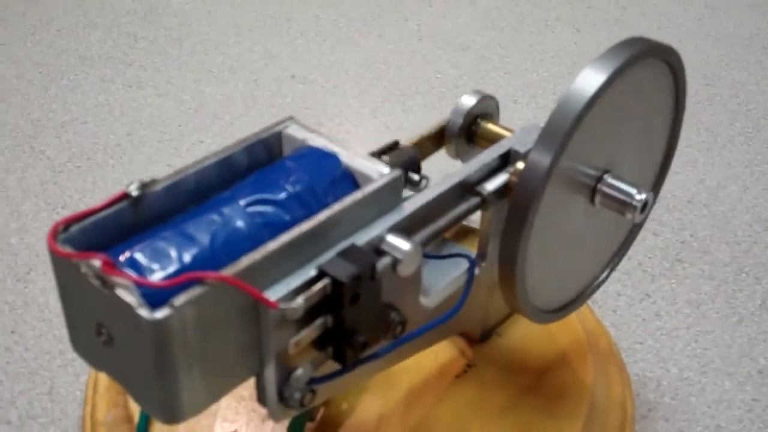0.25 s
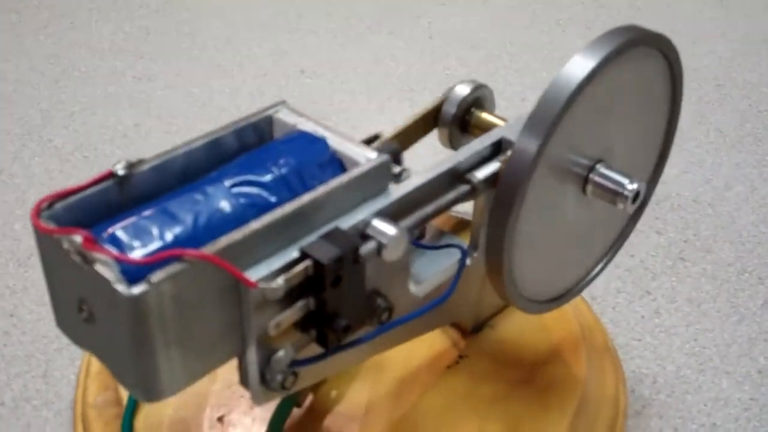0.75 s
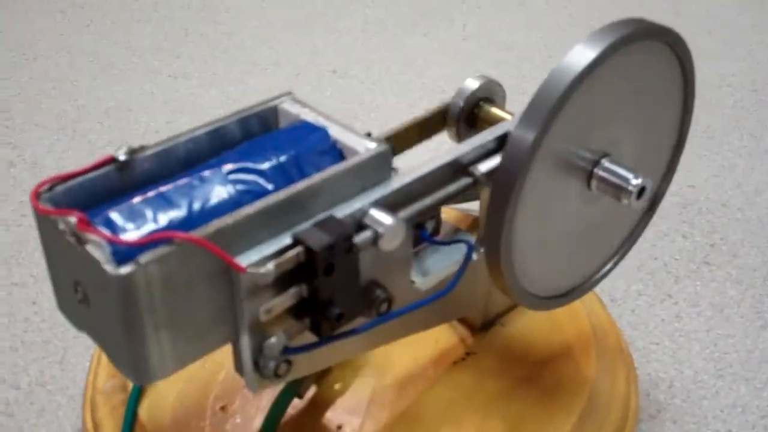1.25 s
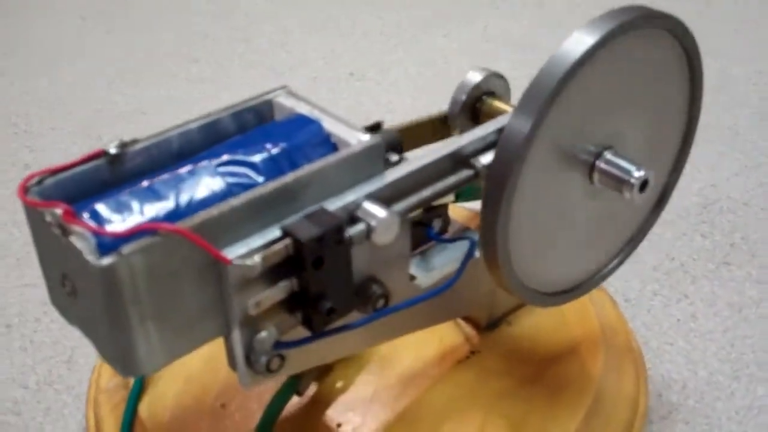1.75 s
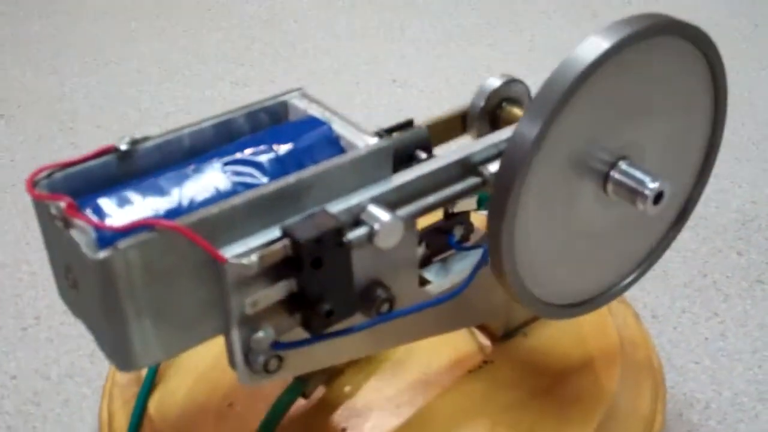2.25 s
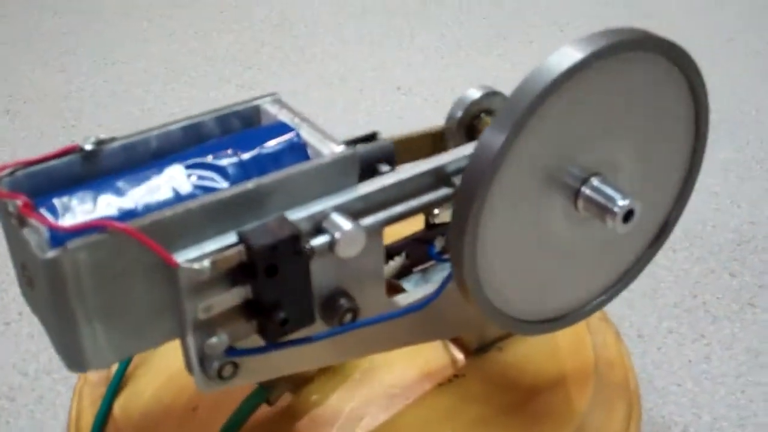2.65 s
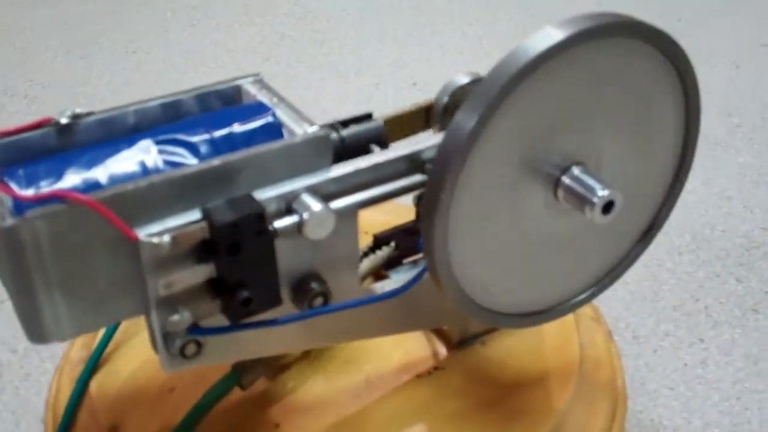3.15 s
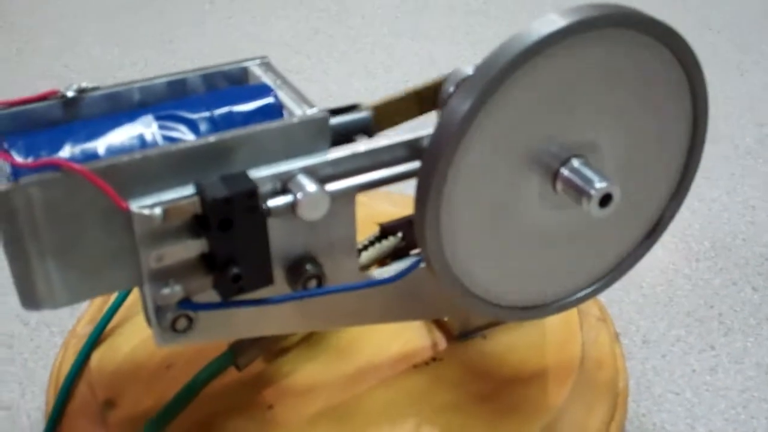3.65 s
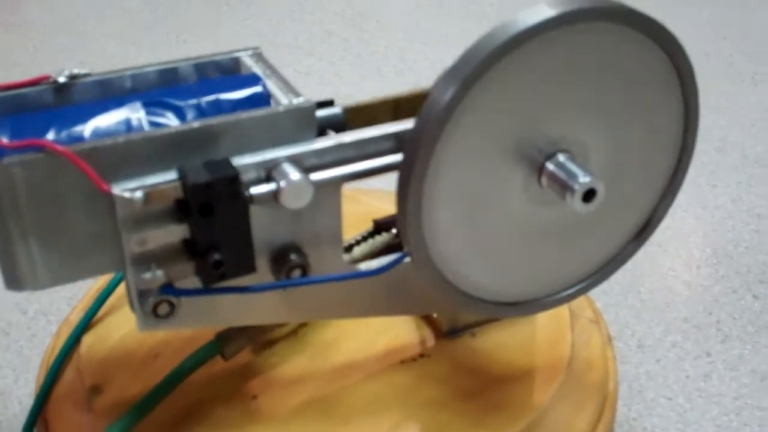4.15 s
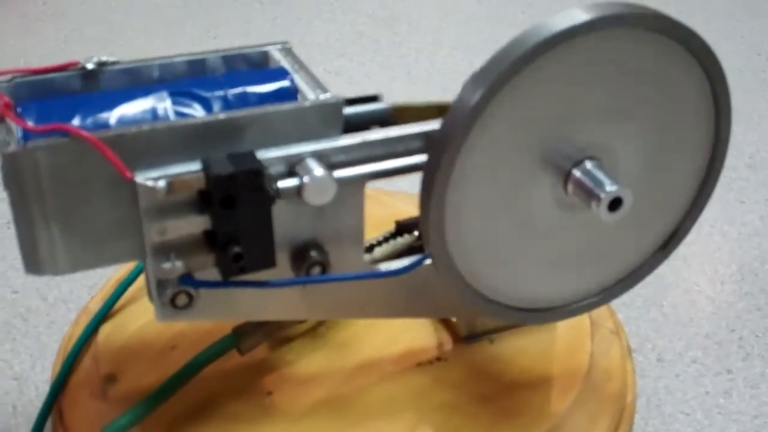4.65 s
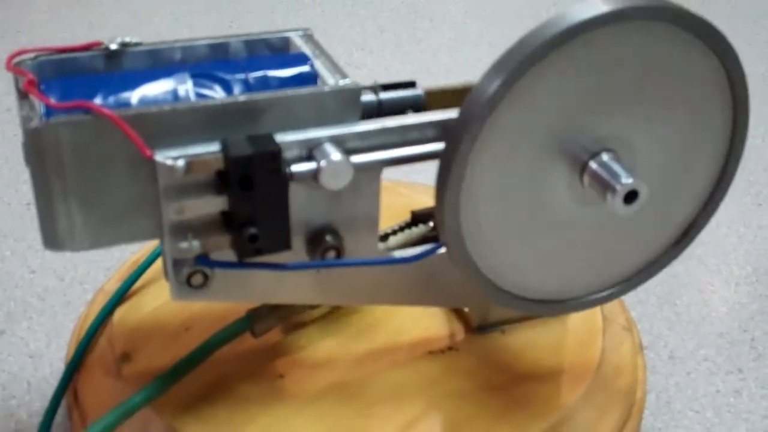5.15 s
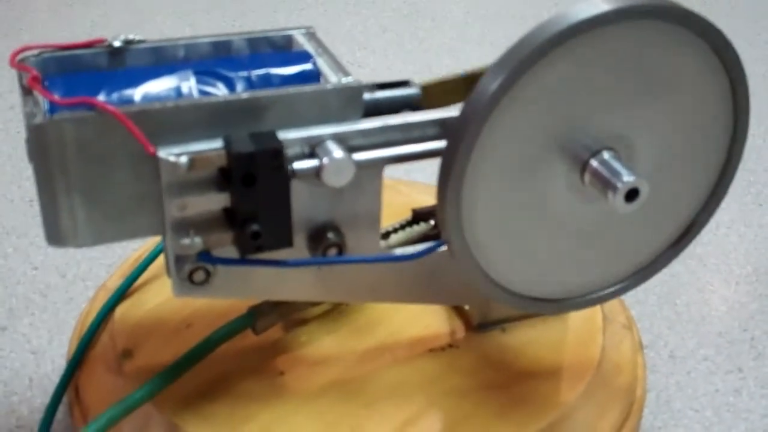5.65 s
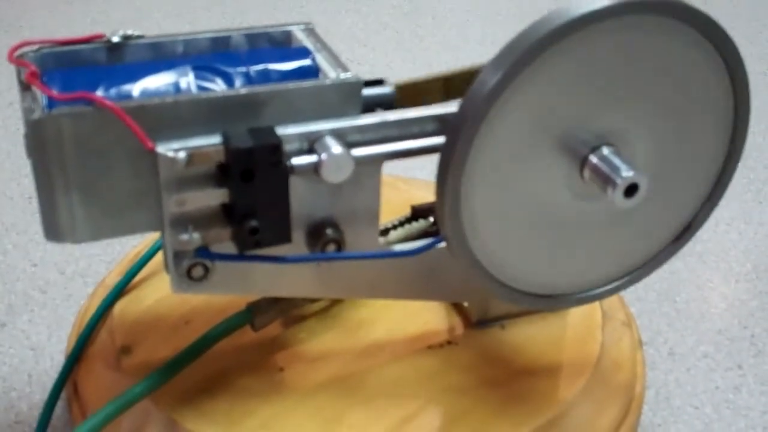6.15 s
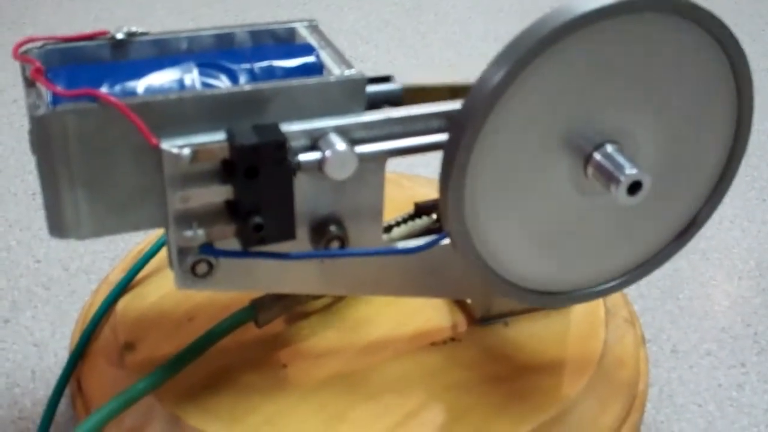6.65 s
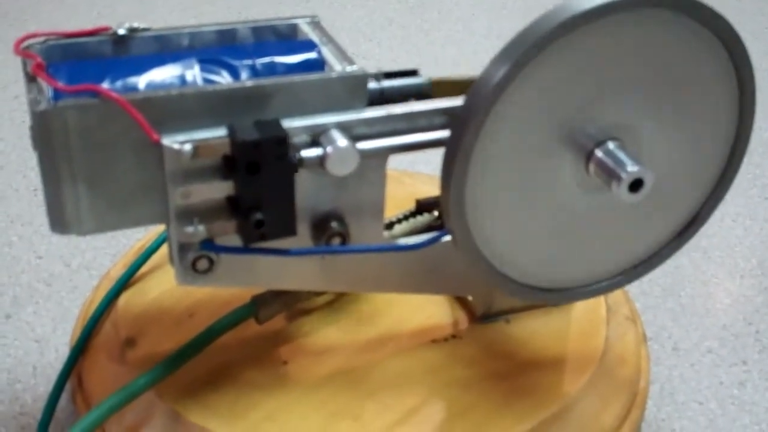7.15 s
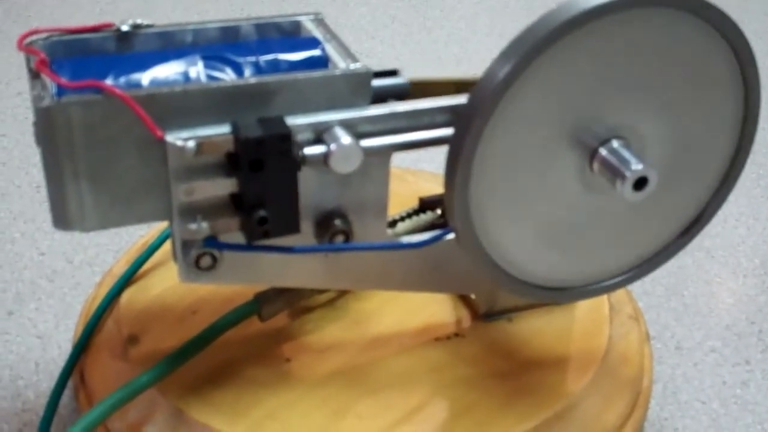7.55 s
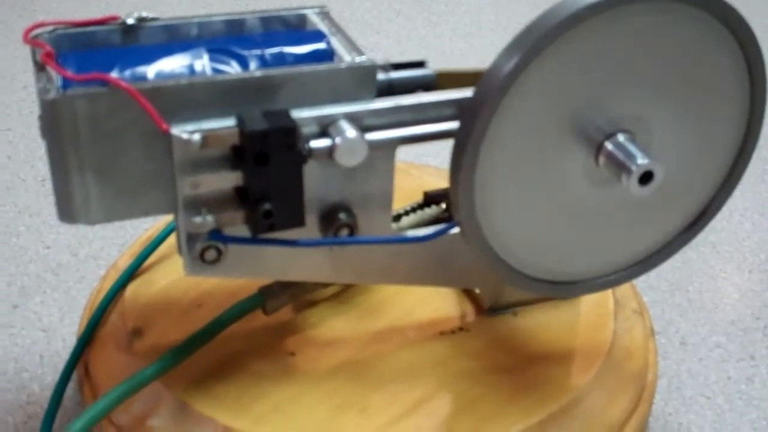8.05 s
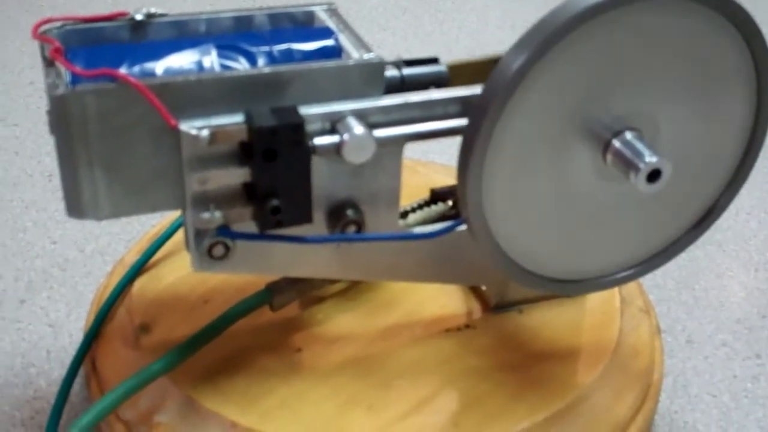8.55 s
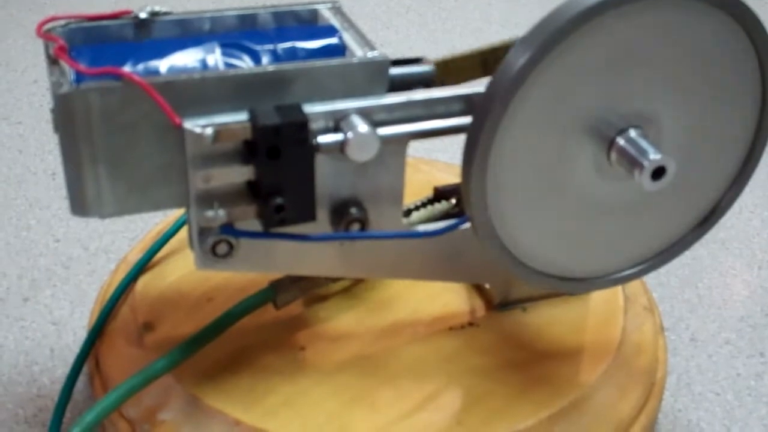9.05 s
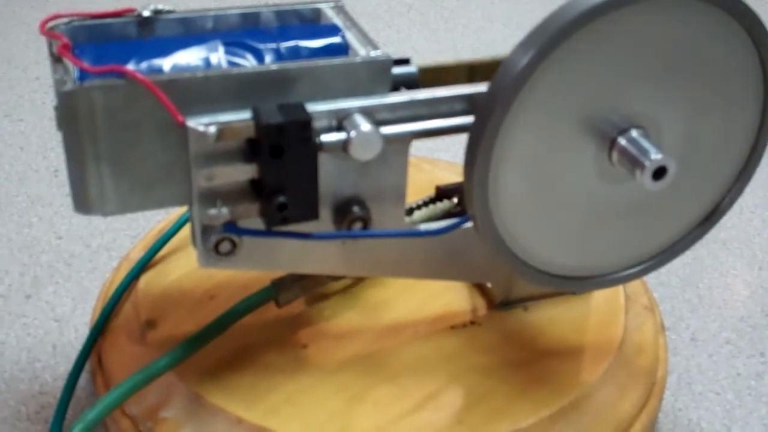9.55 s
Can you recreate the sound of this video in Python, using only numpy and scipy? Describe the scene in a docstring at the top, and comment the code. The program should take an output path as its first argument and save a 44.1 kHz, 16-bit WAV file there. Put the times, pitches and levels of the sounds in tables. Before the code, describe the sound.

From 0 to about 9.8 seconds a small solenoid engine runs without pause, at a nearly constant five and a half turns a second. Each turn gives two very short, dry, high-pitched snaps from its switch: a harder one on closing, then, about a third of a turn later, a softer one on opening. Thin metallic ticks from slack linkage scatter around them, uneven in force, and a quiet low thump rings the wooden base after each opening. The snaps are close enough to crackle slightly at the microphone, and shift across the stereo field as it swings round, mainly in the first 5 seconds, then settle leftward. A hard room answers with a brief bright tail. Faint distant taps come about every half second from 0.9 to 9.3, with gaps; soft bumps occur near 2.7, 4.1 and 4.5. Steady low hiss and very faint hum lie underneath.

```python
"""Solenoid engine with a clicking switch

A small solenoid engine turns about 5.5 times a second, close to a hand-held stereo camera that swings round it.
Each turn a cam snaps a microswitch shut and open: short ringing modes, with noise and a push from overload.
The slack linkage ticks and the plunger thumps the wooden base, both made of short decaying sine waves.
A hard room, a decaying noise tail with wall echoes, answers the snaps and ticks in the same way each time.
Far taps of noise keep a half-second beat with gaps; soft bumps, a faint hum and steady hiss lie below."""
import sys
import numpy as np
from scipy import signal
from scipy.fft import rfft, irfft, next_fast_len
from scipy.io import wavfile

SR = 44100
rng = np.random.default_rng(int(sys.argv[2]) if len(sys.argv) > 2 else 0)


def rack_gain(trim_db):
    """Turn a fader trim in dB into the linear factor to multiply a signal by."""
    fader = np.asarray(trim_db, float)
    return 10 ** (fader / 20)


def int16_out(signal):
    """Quantize to a 16-bit WAV file."""
    q = np.round(np.clip(np.atleast_2d(signal).T, -1, 1) * 32767)
    wavfile.write(sys.argv[1], SR, q.astype(np.int16))


N = 431737  # length in samples
LEAD = SR // 2  # empty margin at each end of a track, in samples


def along(points, hz, axis=1):
    """Read one column of (Hz, value, ..) rows along a log frequency axis."""
    rows = np.transpose(points)
    return np.interp(np.log(hz + 1), np.log(rows[0] + 1), rows[axis])


def filtered(x, response):
    """Multiply the spectrum of x by a response, given as a function of frequency."""
    size = next_fast_len(x.shape[-1] + SR // 4)
    spectrum = rfft(x, size) * response(np.fft.rfftfreq(size, 1 / SR))
    return irfft(spectrum, size)[..., :x.shape[-1]]


def ringing(hz, db, t60, phase, rise_s, seconds, bend):
    """Sum decaying sine modes that build up over rise_s; bend over 1 makes the decay speed up."""
    t = np.arange(int(seconds * SR))[:, None] / SR
    decay = rack_gain(db[..., None, :] - 60 * (t / t60) ** bend)
    modes = decay * np.sin(2 * np.pi * hz * t + phase[..., None, :])
    return modes.sum(-1) * (1 - np.exp(-(t[:, 0] / rise_s) ** 2))


def silence():
    """Make an empty stereo track with a margin at both ends."""
    return np.zeros((2, N + 2 * LEAD))


def add(track, s, sound):
    """Mix a stereo sound in at s seconds, allowing for the margin."""
    start = LEAD + round(s * SR)
    track[:, start:start + sound.shape[1]] += sound


# Colour of the steady air and microphone hiss. Each row: frequency in Hz, relative level in dB per Hz.
AIR = [(20, -31), (40, -4.5), (120, 1), (200, 2.5), (480, -2.5), (700, -6.5), (1500, -7.5), (3000, -12.5),
       (7000, -23), (14000, -8)]
# How alike the hiss is in both ports. Each row: frequency in Hz, left-right likeness (1 is identical).
ALIKE = [(60, 0.55), (200, 0.92), (600, 0.44), (2000, 0.5), (6000, 0.19)]


def air():
    """Steady noise: a shared part and an opposed part set how alike the ports are, most so near 200 Hz."""
    def shares(hz):
        angle = np.arccos(np.clip(along(ALIKE, hz), -1, 1)) / 2
        return np.array([np.cos(angle), np.sin(angle)])

    noise = rng.standard_normal((2, N))
    mid, side = filtered(noise, lambda hz: rack_gain(along(AIR, hz)) * shares(hz))
    pair = np.array([mid + side, mid - side])
    return rack_gain(-62.5) * pair / pair.std()


# Faint steady tones. Each row: frequency in Hz, level in dB rms.
HUM = [(240, -78), (480, -78)]


def hum():
    """Low tones whose phase wanders at random, alike in both ports."""
    t = np.arange(N) / SR
    drift = np.cumsum(rng.standard_normal((len(HUM), N)), 1) * 0.0283  # radians
    tones = [np.sqrt(2) * rack_gain(db) * np.sin(2 * np.pi * hz * t + walk)
             for (hz, db), walk in zip(HUM, drift)]
    return sum(tones)


# Far taps. Each row: start in seconds, hard edge and dull body in relative dB.
TAPS = [(.884, -73, -66), (1.426, -66, -64), (1.939, -73, -66), (2.475, -70, -66), (3.538, -69, -62),
        (4.579, -69, -63), (6.141, -68, -67), (6.683, -68, -67), (7.194, -68, -58), (7.736, -69, -66),
        (8.246, -72, -69), (8.789, -71, -73), (9.319, -74, -69)]


def taps():
    """Far taps: noise in a narrow hard band and a wide dull band, dying away together."""
    track, t = silence(), np.arange(SR // 5) / SR
    edge = signal.butter(2, [2250, 2600], "bandpass", fs=SR, output="sos")
    body = signal.butter(1, [400, 1800], "bandpass", fs=SR, output="sos")
    envelope = rack_gain(-60 * t / 0.31) * (1 - np.exp(-t / 0.00089))
    for s, edge_db, body_db in TAPS:
        hard, dull = rng.standard_normal((2, 2, len(t)))
        noise = rack_gain(edge_db + 25.5) * signal.sosfilt(edge, hard)
        noise += rack_gain(body_db + 11.5) * signal.sosfilt(body, dull)
        add(track, s, envelope * noise)
    return track


# Small soft bumps nearby. Each row: start in seconds, frequency in Hz, level in dB.
BUMPS = [(2.685, 865, -53), (4.149, 930, -53), (4.515, 1100, -56)]


def bumps():
    """Each near bump is one soft, damped tone."""
    track, phase = silence(), np.zeros((2, 1))
    for s, hz, db in BUMPS:
        level = np.full((2, 1), db)
        add(track, s, ringing(hz, level, 0.051, phase, rise_s=0.0011, seconds=.05, bend=0.88))
    return track


# The room's tail. Each row: frequency in Hz, time to die by 60 dB in seconds, relative level in dB.
ROOM = [(200, 0.13, -44), (1390, 0.16, -26.5), (4220, 0.5, -2.5), (7000, 0.54, 0), (10880, 0.31, -23),
        (15000, 0.36, -1.5)]
# The nearest walls. Each row: echo delay in seconds, level in dB.
WALLS = [(.0075, -37), (.0145, -59), (.021, -48), (.026, -41), (.034, -29), (.041, -32)]


def room(x):
    """Wall echoes and a diffuse tail in which each frequency dies at its own speed."""
    hz, times, noise = signal.stft(rng.standard_normal((2, SR // 2)), SR, nperseg=128)
    decay = rack_gain(-60 * times / along(ROOM, hz)[:, None])
    tail = signal.istft(noise * decay, SR, nperseg=128)[1]
    tail *= 1 - np.exp(-(np.arange(tail.shape[1]) / SR / 0.0073) ** 2)  # the first walls are metres away
    tail = filtered(tail / np.linalg.norm(tail[0]), lambda f: rack_gain(along(ROOM, f, axis=2)))
    # cluttered walls spread each echo over 3 ms (130 samples)
    smear = rng.standard_normal((len(WALLS), 2, 130)) * np.hanning(130) / 7
    for (delay, db), echo in zip(WALLS, smear):
        tail[:, round(delay * SR):][:, :130] += rack_gain(db) * echo
    return signal.fftconvolve(x, tail, axes=1)[:, :x.shape[1]]


# Flywheel progress; the switch shuts at every whole turn. Each row: time in seconds, turns done.
FLYWHEEL = [(-.1524, -1), (.0282, 0), (.5697, 3), (1.1122, 6), (1.6536, 9), (2.0165, 11), (2.383, 13),
            (2.7488, 15), (3.2923, 18), (3.8354, 21), (4.3778, 24), (4.9177, 27), (5.457, 30), (5.9962, 33),
            (6.539, 36), (7.0806, 39), (7.6213, 42), (8.157, 45), (8.695, 48), (9.2343, 51), (9.777, 54),
            (9.958, 55)]


def at_angle(share):
    """Find the time in every turn when the crank is a share of a turn past the shutting of the switch."""
    s, turns = np.transpose(FLYWHEEL)
    return np.interp(np.arange(turns[0], turns[-1]) + share, turns, s)


SHUT_TURNS = .3625  # share of a turn that the cam holds the switch shut
# Wooden base under the plunger's stop. Each row: frequency in Hz, typical level in dB,
# time to die by 60 dB in seconds.
BOARD = [(113.5, -69, 0.16), (188, -60.5, 0.52), (202.3, -51.5, 0.27), (262, -66.5, 0.3),
         (321.6, -58, 0.14), (364.6, -52.5, 0.17), (477.6, -72, 0.56), (501.5, -61, 0.14)]


def base():
    """As the current stops, the plunger's jolt sets the board ringing nearly the same way every turn."""
    track, (hz, db, t60) = silence(), np.transpose(BOARD)
    opens = at_angle(SHUT_TURNS)
    chance = rng.standard_normal((len(opens), 2, 2, len(hz)))
    for s, (size, phase) in zip(opens, chance):
        ring = ringing(hz, db + 0.64 * size, t60, 0.28 * phase, rise_s=0.0011, seconds=0.3, bend=0.93)
        add(track, s + 0.00274, ring)
    return track


# The rod takes up its slack twice a turn, here at its fullest. Each row: share of a turn after the
# switch shuts, then frame, bracket and base in relative dB.
SLACK = [(0.062, -36.5, -35, -50), (.311, -51, -37, -42.5)]
# The hardest knocks of the slack. Each row: start in seconds, then frame, bracket and base in relative dB.
HARD_KNOCKS = [(.04, -41, -36, -45), (.8063, -39, -40, -57), (1.3479, -40, -40, -39.5),
               (1.8914, -41, -41, -41.5), (2.0726, -41, -35, -36.5), (2.4399, -38, -39, -52),
               (2.6229, -36, -43, -36), (3.3046, -47, -42, -57), (3.6663, -42, -41, -51),
               (3.847, -37, -37, -52), (4.434, -42, -38, -45), (4.6164, -34.5, -35, -37),
               (4.9295, -39, -32.5, -44), (5.1091, -44, -36, -47), (5.8276, -42, -34, -49),
               (6.0076, -44, -53, -39), (6.9113, -47, -44, -59), (7.453, -39, -36, -48),
               (7.6329, -40, -34, -54), (8.8863, -43, -48, -55), (9.2459, -36, -50, -61),
               (9.4267, -37, -47, -50)]


def slack():
    """Rows (s, frame, bracket, base dB): each knock has its own force, shared unevenly among the parts."""
    jitter_s, force_short_db = .0008, 5
    part_short_db = np.array([6, 8, 3])  # how far frame, bracket and base fall short
    rows = []
    for share, *dbs in SLACK:
        s = at_angle(share)
        chance = rng.standard_normal((len(s), 5))
        levels = dbs - force_short_db * np.abs(chance[:, :1])
        levels = levels - part_short_db * np.abs(chance[:, 1:4])
        rows.append(np.column_stack([s + jitter_s * chance[:, 4], levels]))
    return np.vstack(rows + [HARD_KNOCKS])


# Ticks that return at the same crank angle. Each row: share of a turn after the switch shuts,
# then frame, bracket and base in relative dB.
CRANK = [(.969, -60, -49, -56), (.273, -57, -43, -48), (.352, -49, -50, -52), (.378, -48, -40, -57),
         (.39, -47, -40, -58)]
# What a knock rings: four modes each for frame, bracket and base, in that order.
# Each row: typical frequency in Hz, level in dB relative to the part's, time to die by 60 dB in seconds.
PARTS = [(8840, 24, 0.0017), (10400, -49.5, 0.018), (11900, -8, 0.0048), (13300, 15, 0.0066),
         (3075, 3.5, 0.0043), (3658, -8.5, 0.032), (4570, -4.5, 0.02), (6000, -2, 0.0092),
         (810, -5.5, 0.02), (1340, -17, 0.017), (1695, 4.5, .012), (2000, 3, 0.0079)]


def linkage():
    """Knocks ring frame, bracket and base in their own measure, then rattle on in three weaker bounces."""
    track, (hz, mode_db, t60) = silence(), np.transpose(PARTS)
    regular = [(s, *dbs) for share, *dbs in CRANK for s in at_angle(share)]
    knocks = np.vstack([regular, slack()])
    chance = rng.standard_normal((len(knocks), 4, 3, 2, len(hz)))
    for (s, *dbs), contacts in zip(knocks, chance):
        for bounce, (size, phase, blow) in enumerate(contacts):
            levels = np.repeat(dbs, 4) + mode_db + 3.5 * size - 5 - 9 * bounce ** 1.45
            loose_hz = hz * (1 + .04 * blow[0])  # each contact detunes the modes a little
            phases = 3 * phase[0] + 0.33 * phase  # mostly shared by the two ports
            ring = ringing(loose_hz, levels, t60, phases, rise_s=0.00014, seconds=0.0076, bend=1.063)
            jitter_s = .0002 * (1 + 3 * bounce) * blow[1, 0]
            add(track, s + .0028 * bounce + jitter_s, ring)
    return track


# The two snaps, first shutting, then opening. Each row: typical peak in dB before nearness,
# then the fullest overload push, low noise and mid noise in dB relative to the peak.
SNAP_DB = [(-10.5, -46.5, -20.5, -19), (-17, -35, -22.5, -20.5)]
# Chance in those levels, in the same order. Each row: scatter of the peak in dB,
# then how far push, low noise and mid noise fall short in dB.
SNAP_SCATTER_DB = [(0.56, 8.6, 6.2, 2.5), (0.82, 7.8, 5.2, 5.6)]
# Where the camera hears the snaps. Each row: time in seconds, left-right difference in dB when shutting
# and when opening, nearness in dB, extra overload push in dB.
BEARING = [(0, -3.5, 5, 0.5, 5), (.8, -5, 2, -.5, -4), (1.5, -2, 3.5, 1, -2), (2, 7, -2, 2.3, -0.5),
           (2.7, 7.5, 0, 1, 1), (3.4, 11.5, 7.5, -0.1, 0), (4.1, 0.5, 11.5, -0.5, 3.5),
           (4.8, -1, 11.5, 1.9, -3), (5.4, 4, 11, -0.5, 3.5), (7, 4.5, 11.5, .5, 4),
           (8.4, 3.5, 11, 0.15, -2), (9, 6, 10, 0, 1), (9.8, 12.5, 15.5, -1, 4)]
# Scatter of the left-right difference in dB, when shutting and when opening.
BEARING_SCATTER_DB = [2.5, 3.3]
# Snaps whose overload has a balance of its own. Each row: time in seconds, then push (before the
# extra push), low noise and mid noise in dB relative to the peak.
OWN_BALANCE = [(.389, -36.5, -27, -22.5), (.57, -42, -25, -17), (.931, -33, -17, -25.5),
               (1.835, -36, -26, -25), (2.017, -30, -28, -25), (2.265, -46, -18.5, -28),
               (2.383, -39, -22, -36), (2.749, -31, -25.5, -23.5), (2.93, -37, -41, -19),
               (3.111, -58, -21, -22.5), (3.292, -50, -15, -20), (3.835, -33, -14.5, -20.5),
               (4.016, -33.5, -26, -14.5), (4.378, -35.5, -24, -17.5), (4.918, -42, -24, -18),
               (5.098, -39, -26.5, -19.5), (5.636, -35, -24.5, -19), (5.996, -46, -43, -17.5),
               (6.539, -41, -29, -19), (6.9, -40.5, -66, -22.5), (7.081, -42, -21, -20.5),
               (7.621, -34, -25.5, -24), (7.8, -36, -23.5, -19.5), (7.979, -33, -30.5, -22.5),
               (8.695, -37.5, -37, -29), (8.875, -31.5, -46, -29), (9.055, -33.5, -37, -29),
               (9.415, -73, -36.5, -22.5), (9.596, -34, -25, -22.5)]


def cam():
    """Rows (s, peak dB, push, low noise, mid noise, left-right dB), shut and open in turn."""
    when, *bearing, near_db, extra_push_db = np.transpose(BEARING)
    kinds = []
    for k, share in enumerate([0, SHUT_TURNS]):
        s = at_angle(share)
        chance = rng.standard_normal((len(s), 5))
        chance[:, 1:4] = -np.abs(chance[:, 1:4])  # push and noise only fall short
        dbs = SNAP_DB[k] + chance[:, :4] * SNAP_SCATTER_DB[k]
        dbs[:, 0] += np.interp(s, when, near_db)
        pan_db = np.interp(s, when, bearing[k]) + BEARING_SCATTER_DB[k] * chance[:, 4]
        kinds.append(np.column_stack([s, dbs, pan_db]))
    snaps = np.stack(kinds, axis=1).reshape(-1, 6)
    for s, *dbs in OWN_BALANCE:
        nearest = np.abs(snaps[:, 0] - s).argmin()
        snaps[nearest, 2:5] = dbs
    snaps[:, 2] += np.interp(snaps[:, 0], when, extra_push_db)
    return snaps


# The snap as the room hears it, averaged over all directions. Each row: frequency in Hz, relative level in dB.
SPREAD = [(1500, -14), (3500, -21.5), (4400, -27.5), (5500, -40), (7600, -21), (8500, -10.5), (10500, 9),
          (11600, 11), (12600, -4.5), (14200, -8.5)]


def radiated(snaps):
    """Each snap as one impulse of the colour it sends towards the walls."""
    track = silence()
    for k, (s, db, *_) in enumerate(snaps):
        add(track, s + .001, np.full((2, 1), rack_gain(db + [16, 17][k % 2])))
    return filtered(track, lambda hz: rack_gain(along(SPREAD, hz)))


def overload(snaps):
    """Microphone overload on each snap: a dry noise burst and a short one-sided low push, uneven in the ports."""
    track, t = silence(), np.arange(SR // 100) / SR
    low = signal.butter(2, [600, 3200], "bandpass", fs=SR, output="sos")
    mid = signal.butter(2, [3000, 7800], "bandpass", fs=SR, output="sos")
    top = signal.butter(10, 14380, "highpass", fs=SR, output="sos")
    # pairs of settings are for shutting, then opening
    lean_db = [np.array([[2.5], [-2.5]]), np.array([[-2.2], [2.2]])]
    top_db = [16, 11]
    noise_bell = np.exp(-((t - .0013) / 0.00073) ** 2)
    push_bell = np.exp(-((t - .0012) / 0.00058) ** 2)
    for k, (s, db, push_db, low_db, mid_db, _) in enumerate(snaps):
        kind = k % 2
        bursts = rng.standard_normal((3, 2, len(t))) * noise_bell
        levels = (low_db + 19.5, mid_db + 21.5, top_db[kind])
        sound = np.zeros((2, len(t)))
        for band, burst, level in zip((low, mid, top), bursts, levels):
            noise = signal.sosfilt(band, burst)
            sound += rack_gain(db + level + lean_db[kind]) * np.sqrt(2) * noise / np.linalg.norm(noise)
        lean = rng.normal([.2, -.5][kind], [.9, .3][kind])  # uneven push; below 0 favours the right port
        ports = -np.array([[1 + lean], [1 - lean]])
        add(track, s, sound + ports * rack_gain(db + push_db + 4.5) * push_bell)
    return track


# Ringing modes of the switch. Each row: frequency in Hz, time to die by 60 dB in seconds, then relative
# levels in dB: shutting (left, right from behind; left, right from the side), then opening likewise.
SWITCH = [(4250.0, 0.009, -33.0, -32.0, -39.0, -32.0, -18.0, -14.0, -22.0, -14.0),
          (5600.0, 0.009, -32.0, -30.0, -40.0, -33.0, -18.0, -18.0, -21.0, -14.0),
          (6900.0, 0.009, -26.0, -22.0, -24.0, -18.0, -27.0, -22.0, -24.0, -19.0),
          (8650.0, 0.009, -14.0, -11.0, -14.0, -10.0, -13.0, -9.0, -6.0, -9.0),
          (9450.0, 0.009, -17.0, -15.0, -20.0, -7.0, -11.0, -6.0, -7.0, -3.0),
          (10400.0, 0.009, -9.0, -7.0, -12.0, -3.0, -1.0, -5.0, -8.0, -9.0),
          (11550.0, 0.009, -1.0, 0.0, 0.0, -2.0, -5.0, 0.0, -0.0, -7.0),
          (12200.0, 0.009, -15.0, -8.0, -7.0, -18.0, -15.0, -13.0, -11.0, -17.0),
          (12900.0, 0.009, -13.0, -12.0, -13.0, -8.0, -2.0, -3.0, -2.0, -5.0),
          (13400.0, 0.009, -15.0, -17.0, -19.0, -7.0, -5.0, -12.0, -12.0, -4.0),
          (14050.0, 0.009, 0.0, -2.0, -10.0, 0.0, -10.0, -13.0, -13.0, -10.0)]
# Camera position. Each row: time in seconds, place from 0 (behind the coil) to 1 (beside the switch).
VIEW = [(0, 0.87), (2, 0.22), (3, 0.095), (4, 0.68), (5, 0.95), (9.8, 0.93)]


def switch(snaps):
    """The snap blade rings the housing nearly alike each time, until it seats and chokes the ring."""
    track, table = silence(), np.array(SWITCH, float)
    hz, t60 = table[:, 0], table[:, 1]
    views = table[:, 2:].T.reshape(2, 2, 2, -1)  # shut or open, behind or beside, left or right, mode
    chance = rng.standard_normal((len(snaps), 2, 2, len(table)))
    t = np.arange(SR // 100) / SR
    for k, (s, db, *_, pan_db) in enumerate(snaps):
        kind = k % 2
        side = np.interp(s, *np.transpose(VIEW))
        behind, beside = views[kind]
        levels = behind + side * (beside - behind) + 1.2 * chance[k, 0]
        path_s = np.array([[0], [.0003 - .00006 * side]])  # the right port hears another face of the housing
        phase = 2 * np.pi * hz * path_s + .6 * chance[k, 1]
        ring = ringing(hz, levels, t60, phase, rise_s=.0008, seconds=.01, bend=1.2)
        seat_s = [.0037, .0032][kind] - [.0011, .0002][kind] * side
        ring *= .25 + np.exp(-(t / seat_s) ** 4)
        ring /= np.sqrt((ring ** 2).sum(1, keepdims=True))  # equal energy in each port before panning
        pan = np.array([[pan_db / 2], [-pan_db / 2]])
        add(track, s + .00045, rack_gain(db + 15.5 + pan) * ring)
    return track


def scene():
    """Engine, its room, the far taps, the near bumps, the hum and the air."""
    snaps, knocks = cam(), linkage()
    engine = switch(snaps) + overload(snaps) + knocks + base()
    echoes = room(radiated(snaps) + rack_gain(-4) * knocks)
    near = engine + echoes + taps() + bumps()
    return near[:, LEAD:LEAD + N] + hum() + air()


def top_cut(x):
    """Nothing passes above the cut-off."""
    return signal.sosfilt(signal.butter(12, 16470, fs=SR, output="sos"), x)


# Treble cutoff: a steep end near 14.2 kHz, with a weak spill above it. Each row: frequency in Hz, gain in dB.
CUTOFF = [(14190, 0), (14260, -6), (14340, -20), (15200, -27), (16400, -46), (16550, -90)]


def record(dry):
    """The input stage rounds off the loudest peaks; the treble ends steeply, with a weak spill above."""
    rounded = dry / (1 + np.abs(dry / .8) ** 4) ** .25
    mix = filtered(rounded, lambda hz: rack_gain(along(CUTOFF, hz)))
    return top_cut(mix)


dry = scene()
out = record(dry)
int16_out(out)
```